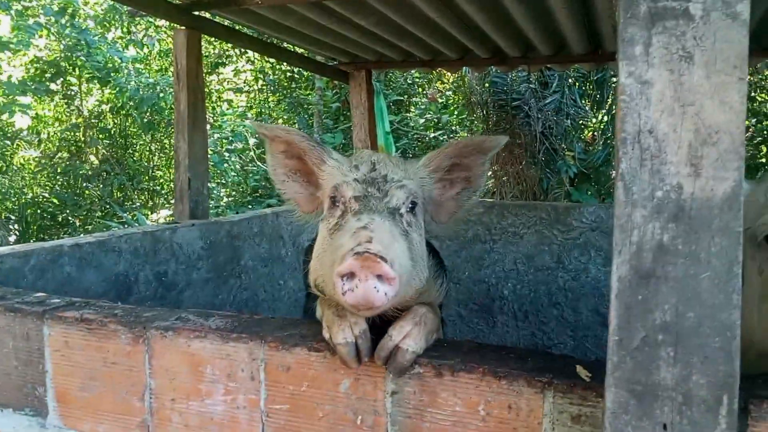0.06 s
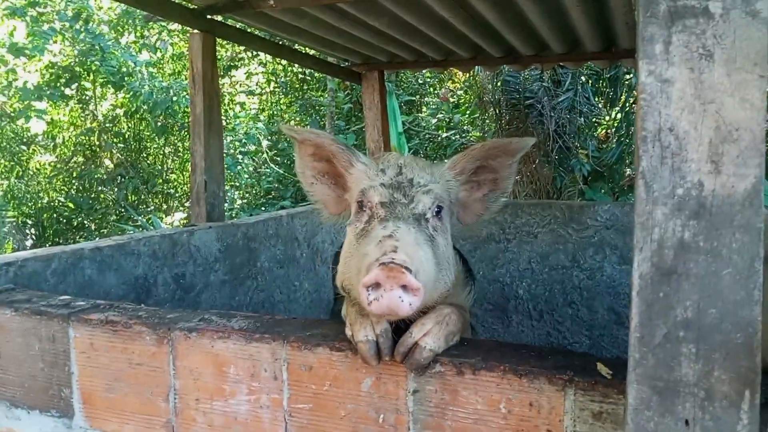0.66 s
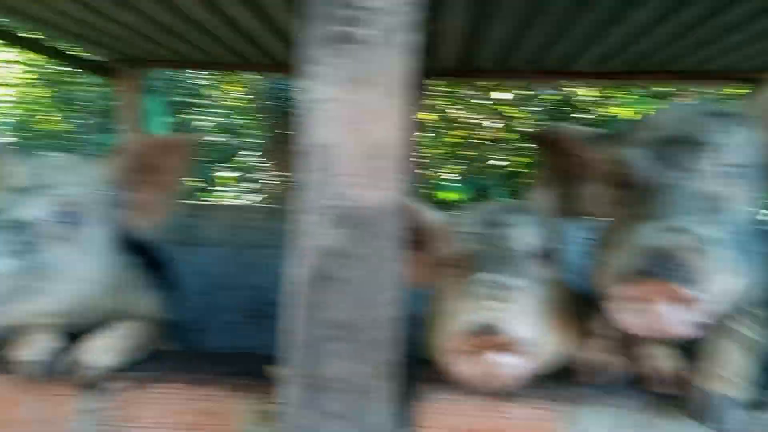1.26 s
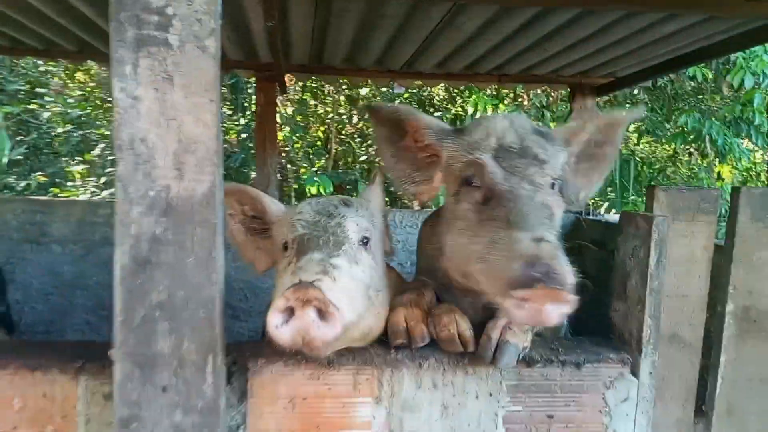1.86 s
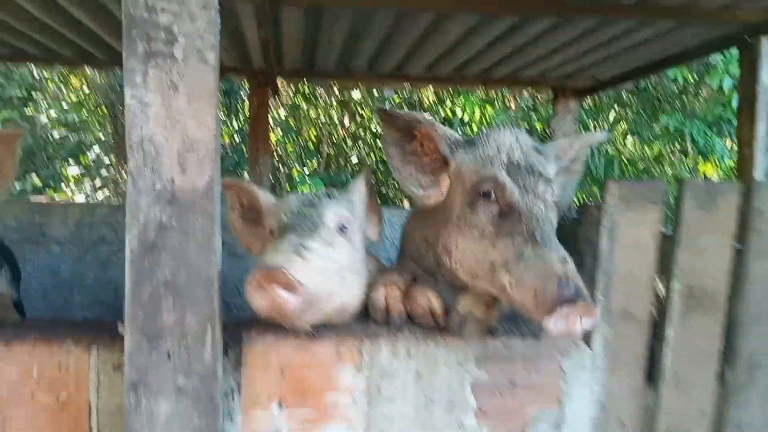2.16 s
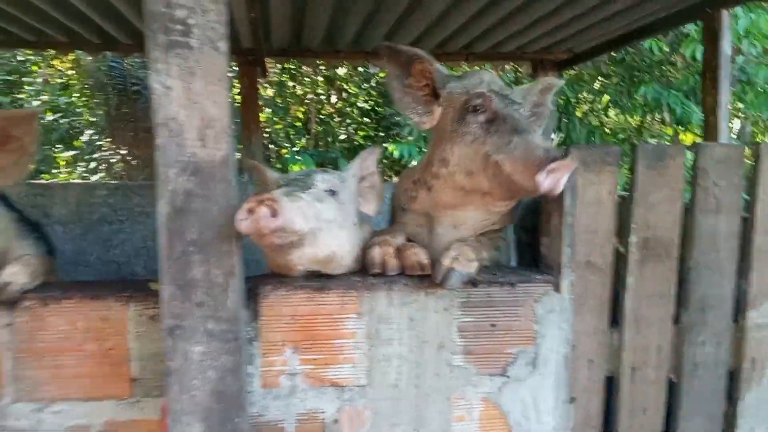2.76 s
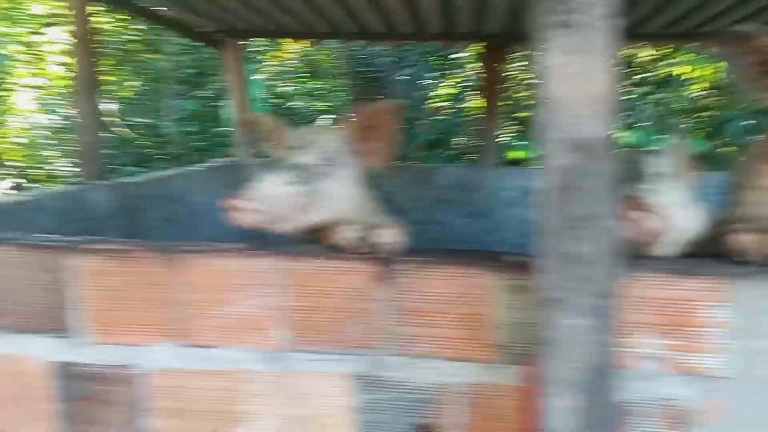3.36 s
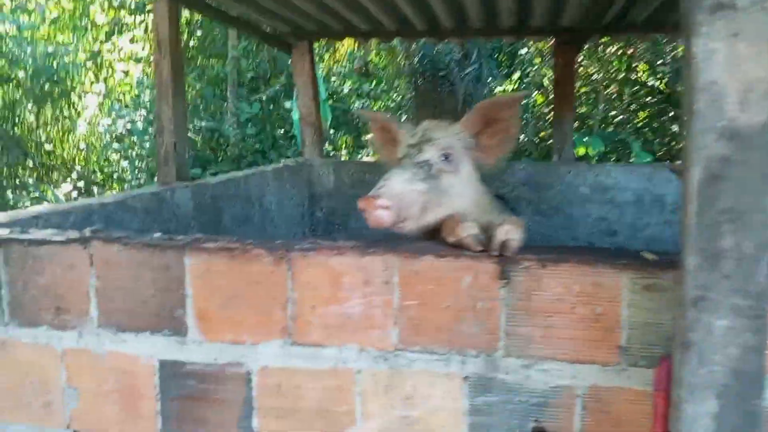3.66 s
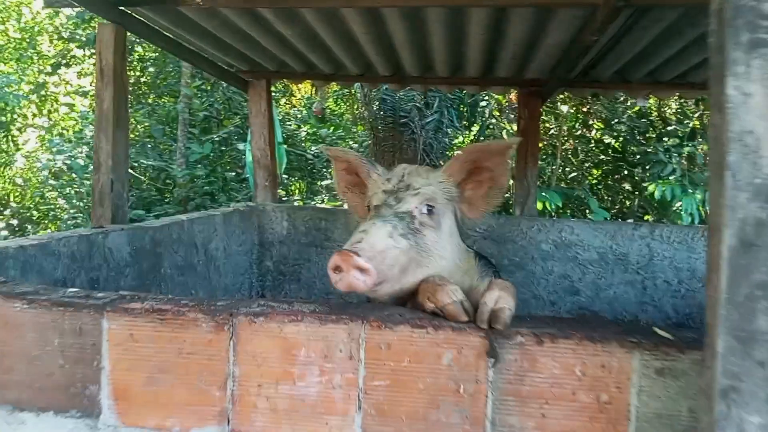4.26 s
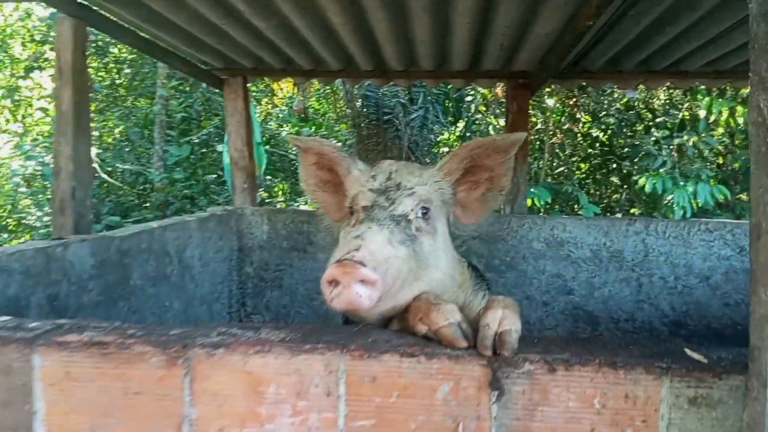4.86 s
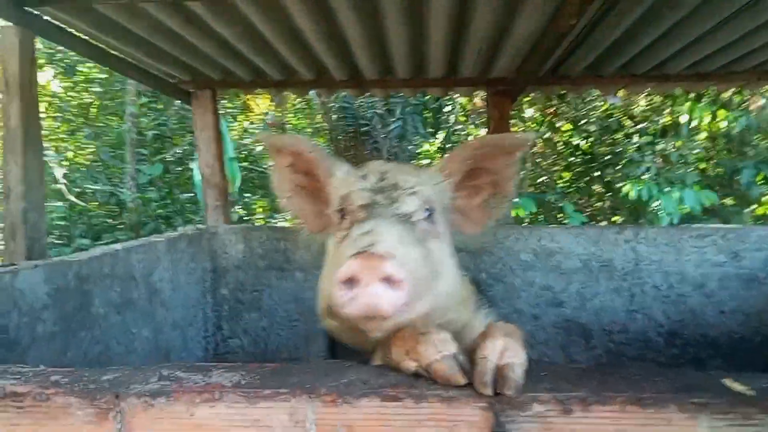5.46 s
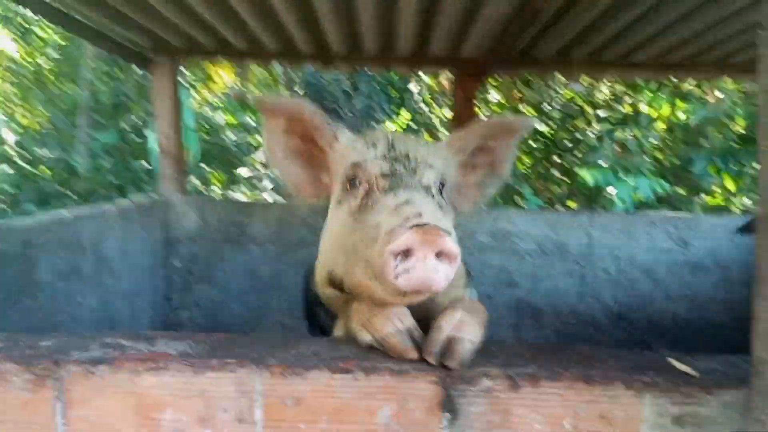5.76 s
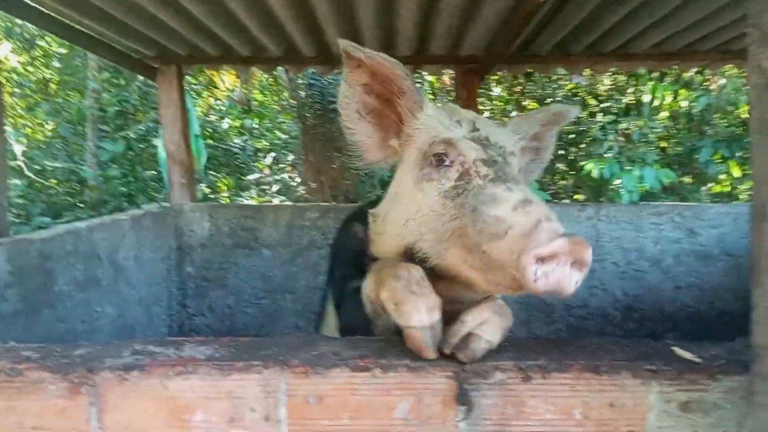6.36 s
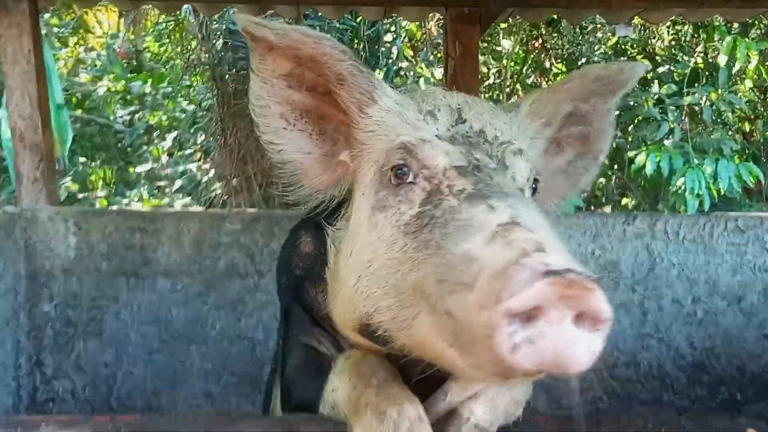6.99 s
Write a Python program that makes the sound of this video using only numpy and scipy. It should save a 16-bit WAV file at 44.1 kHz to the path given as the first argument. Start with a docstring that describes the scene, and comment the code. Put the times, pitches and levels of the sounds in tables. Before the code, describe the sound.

Short, throaty pig grunts and nostril puffs in a roofed pen, softer in the middle, with a quiet outdoor background.

```python
"""A low yard wash and faint insects in the trees run from start to finish.
At once, close by, pigs grunt in turn over the brick wall of a roofed pen: each grunt is a rattle of
about 35 throat beats a second ringing the long snout, and air hisses from the nostrils in between.
From about 1 s come a few wet lip smacks. The grunts drop to a mutter in the middle and are loud again
from 5.4 s. Walls and roof throw every beat back."""
import sys
import numpy as np
from scipy import signal
from scipy.fft import rfft, irfft
from scipy.io import wavfile
from scipy.ndimage import uniform_filter1d, map_coordinates

SR = 44100
rng = np.random.default_rng(int(sys.argv[2]) if len(sys.argv) > 2 else 0)


def to_wav(sig):
    """Store sig (one row per channel, or 1-D mono) as 16-bit WAV at the path in sys.argv[1].

    Samples outside -1..1 are clipped; the rate is SR.
    """
    pcm = np.clip(np.atleast_2d(sig), -1, 1) * 32767
    pcm = np.round(pcm).astype(np.int16)
    wavfile.write(sys.argv[1], SR, pcm.T)  # frames by channels


N = 318843

# the palette of throat shapes, one row a resonance: f/Hz, width/Hz, level/dB
NASAL = [(315, 74, -3), (712, 120, -3), (1100, 28, -5), (1220, 99, 3.2), (2000, 142, -5), (2900, 250, -25),
         (3460, 470, -18.5), (5080, 370, -22)]
OPEN = [(307, 57, -0.5), (520, 170, 0.5), (740, 70, -2), (915, 120, 2), (1190, 71, 6), (1790, 150, -10.5),
        (2850, 340, -13.5), (5650, 1100, -29.5)]
RASP = [(313, 52, -6.5), (651, 160, -13), (1277, 74, -4), (1680, 99, -5), (1860, 170, -4.5),
        (3630, 450, -23), (5750, 130, -13), (5950, 480, -15.5), (7524, 168, -34)]
SNOUT = [(334, 100, -1.5), (890, 110, -4), (1290, 200, -6), (1947, 194, -1.5), (2180, 54, -2),
         (3323, 467, -22), (3480, 490, -12), (4840, 570, -26.5)]
MUTTER = [(242.5, 39, 1.5), (355, 72, -6), (687, 103, -3.5), (1201, 99, -2.5), (1700, 127, 1),
          (3870, 260, -13.5)]
SNORT = [(361, 68, -5), (654, 176, -4), (1290, 124, -3), (1853, 220, 1.5), (2030, 96, 2), (3000, 250, -11),
         (3690, 740, -13.5)]
PURR = [(350, 100, -2), (760, 200, -11.5), (1344.3, 150, -1), (1846, 100, -1), (2035, 70, 3.5),
        (3420, 410, -16), (4509, 610, -14.5)]
BUZZ = [(311, 105, -1.5), (730, 80, -5.5), (1257, 60, -3), (1436, 150, -1), (2200, 910, -22),
        (3970, 710, -20.5), (5489, 256, -14.5), (7400, 330, -35), (8669, 420, -23)]
HONK = [(356, 140, -12.5), (796, 155, -10), (1200, 99, -2.5), (1477, 72, 1.5), (1620, 270, -9.5),
        (4340, 300, -16), (5510, 321, -17.5), (7489, 591, -43.1), (8960, 1060, -29)]
DEEP = [(310, 122, -2.0), (727, 144, -3.5), (1210, 65, 1.3), (1420, 250, -8.5), (1860, 220, -15.5),
        (2770, 70, -19), (3670, 320, -10.5), (4236, 120, -25), (5600, 800, -22.5)]
HOLLOW = [(302.4, 78, -1.5), (644, 126, -4.5), (1050, 40, -10.5), (1254, 135, -4.5), (2056, 200, -15),
          (3260, 287, -24.5), (3735, 110, -15), (4800, 1000, -31.5)]
# the same shapes by name
THROATS = dict(nasal=NASAL, open=OPEN, rasp=RASP, snout=SNOUT, mutter=MUTTER, snort=SNORT, purr=PURR, buzz=BUZZ, honk=HONK, deep=DEEP, hollow=HOLLOW)
# grunt cues: first beat t/s, last beat t/s, beats, middle beat's lag/s, crest level/dB, crest place/0-1,
# swell/dB, fade/dB, brightness/(dB per octave), resonance rise/share, chest send/dB,
# lead-in hum level/dB (None: runs on from the grunt before), air level/dB re the slap, throat name
GRUNTS = [ (.0058, .0355, 2, 0, -31, .1, 1, 15, -1.7, 0, -33, -60, -4, "nasal"),
          (.1128, .2264, 5, 0, -21.5, .72, 18, 15, -1, .03, -33, -65, -10, "open"),
          (.4434, .4981, 3, 0, -21, .85, 19, 1, -.5, .03, -32, -50, -17, "nasal"),
          (.523, .716, 7, -.0019, -22.5, .45, 0, 5.5, .8, .02, -29.5, None, -13, "rasp"),
          (.7485, .8004, 3, .0003, -21, .8, 2, 1, 2.4, .03, -32, None, -13, "open"),
          (1.023, 1.1052, 4, -.001, -21, .6, 19, 10, -1.3, 0, -31, -52, -10, "nasal"),
          (1.2561, 1.362, 5, -.0018, -22.5, .5, 17, 20, -1, 0, -35, -50, -9, "open"),
          (1.5158, 1.6352, 5, -.0009, -34, .3, 8, 3, 1.5, 0, -37, -43, -11.5, "snout"),
          (1.7437, 1.883, 6, -.0046, -25.5, .52, 22, 23, 0, .03, -34, -58, -8, "open"),
          (1.9605, 2.0759, 5, .001, -31.5, .55, 16, 2.5, 1.2, -.06, -35, -52, -8, "snout"),
          (2.5108, 2.6938, 7, .0046, -36.5, .3, 9, 7, -3.3, .1, -38.5, -57, -5, "mutter"),
          (2.7235, 2.8135, 4, 0, -31.5, .28, 5, 22, -1.2, -.04, -33, None, -6, "purr"),
          (3.4882, 3.6391, 6, .0005, -37.5, .38, 13, 10, -3.3, -.06, -37, -65, -6.5, "purr"),
          (3.743, 3.8237, 3, .003, -38, .4, 1, 3, -2, -.06, -39, None, 1, "snort"),
          (4.2235, 4.347, 5, .001, -31, .74, 8, 13, .6, .06, -35, -52, -11.5, "buzz"),
          (4.572, 4.7264, 6, -.0018, -35.5, .35, 11, 7, -1.2, -.04, -35, -58, -15, "purr"),
          (5.0685, 5.1845, 5, -.0032, -33.5, .75, 18, 2, -.3, .04, -33.5, -49, -10, "snout"),
          (5.215, 5.3482, 5, .0012, -33.5, .05, 0, 14, -.5, -.06, -31, None, 2.5, "snort"),
          (5.4413, 5.6495, 8, -.0028, -22.3, .83, 23, 15, -2, .12, -30, -65, -10, "honk"),
          (5.7212, 5.8297, 5, -.0015, -23.5, .7, 11, 7, .8, .04, -30, None, -17, "deep"),
          (6.176, 6.285, 5, -.001, -24.5, .63, 21, 7, .5, .05, -32, -51, -22, "deep"),
          (6.5817, 6.672, 4, .0005, -25, .6, 10, 8, -1, .09, -35, -48, -7, "hollow"),
          (6.8997, 6.9768, 3, .002, -37.5, .7, 3, 1, -4.5, -.1, -31, -46, 3, "snort"),
          (7.0197, 7.1617, 6, -.0023, -25, .3, 2.5, 10, 0, .08, -29, None, -7, "hollow")]
# nostril puff cues: peak t/s, half length/s, level/dB, brightness/(dB per octave)
SNIFFS = [(0.242, 0.019, -49.5, 0), (0.794, 0.045, -48.5, 0), (1.167, 0.065, -55, 1.5),
          (1.312, 0.044, -46.5, -1.5), (1.84, 0.035, -53, 1), (2.129, 0.046, -53.5, 1),
          (2.35, 0.014, -58, -2), (2.851, 0.027, -49.5, -2.5), (3.056, 0.11, -62, -1.5),
          (3.228, 0.018, -53.5, -1.5), (3.646, 0.068, -51, -2.5), (3.857, 0.037, -44.5, -2.5),
          (4.001, 0.021, -46.5, 2), (4.342, 0.084, -44.5, -3), (4.54, 0.041, -42, -2),
          (4.761, 0.1, -53, -2.5), (5.27, 0.085, -43.5, -4.2), (5.682, 0.07, -42, -5),
          (5.882, 0.03, -44.5, 2.5), (6.2, 0.019, -51, 6.5), (6.325, 0.038, -47, 0.5),
          (6.677, .035, -54.5, 3), (6.97, 0.055, -36.5, -3.5), (7.18, 0.11, -48.5, -2.5)]
# EQ of the nostril hiss: f/Hz, level/dB
NOSTRIL_EQ = [(120, -16), (200, -5), (957, -9), (1400, -5), (1650, -5.5), (1840, 0), (3610, -11),
              (5010, -2), (7620, -16), (10200, -13), (15500, -33)]
# lip smack cues: t/s, level/dB, centre f/Hz
SMACKS = [(.985, -34.5, 2500), (1.663, -43, 6000), (2.937, -46.5, 2500), (2.999, -41, 1720),
          (3.93, -42, 1980)]
# EQ of the yard wash: f/Hz, level/dB
YARD_EQ = [(18, -54), (30, -12), (81, -2), (173, -1), (455, -8), (606, -5), (996, -11.5), (1870, -6),
           (3400, -17), (5310, -26), (7650, -24), (9680, -24), (15500, -39)]
# early reflections off wall, floor and roof: delay t/s, gain
ECHOES = [(.0034, 0.022), (.0066, 0.18), (.0085, -0.12), (.0118, 0.18), (.0155, 0.061)]
# reverb tail under the roof: f/Hz, t60/s, level/dB
PEN_TAIL = [(312, 0.2, 6), (1230, 0.25, 0), (2500, 0.36, -8.5), (6000, 0.54, -8.5), (13900, 0.085, 6.5)]

TAPS = 4096  # samples in one beat's buffer
PREROLL_S = TAPS // 8 / SR  # room in that buffer ahead of the hit
BINS = np.fft.rfftfreq(TAPS, 1 / SR)
DULLING_DB_PER_OCTAVE, CLOSING_SHARE = .08, .002  # treble and resonances sink per dB under the crest
CREST_STRETCH = 1.005  # factor on the resonances at the crest
HUM_HZ, HUM_LEAD_S = 178, .037
CHEST_START_HZ, CHEST_END_HZ, CHEST_SINK_S = 166, 114, .13  # the chest note sinks as the air runs out
CHEST_TRIM_DB, CHEST_FOLLOWS = -4, .28  # the chest takes only this share of the effort's swell


def amp(db):
    """Decibels to gain."""
    return 10 ** (np.asarray(db) / 20)


def unit_rms(x):
    """Scales to an rms of one."""
    return x / np.sqrt(np.mean(x ** 2) + 1e-20)


def curve(points, hz, column=1):
    """Reads a column of a table along log frequency."""
    points = np.array(points)
    return np.interp(np.log(hz + 1), np.log(points[:, 0] + 1), points[:, column])


def add(mix, at_s, sound):
    """Drops a sound into the mix."""
    start = round(at_s * SR)
    sound = sound[max(-start, 0):]
    part = mix[max(start, 0):][:len(sound)]
    part += sound[:len(part)]


def tilt(hz, slope_db):
    """Tilt EQ in dB an octave, pivoting at 1200 Hz and flat below 500 Hz."""
    return amp(slope_db * np.log2(np.maximum(hz, 500) / 1200))


def minimum_phase(gain):
    """Spectrum of the fastest-starting ring that has this gain."""
    log_gain = np.log(np.r_[gain, gain[-2:0:-1]] + 1e-7)
    return np.exp(np.conj(signal.hilbert(log_gain)))[:len(gain)]


def noise(gain, size):
    """Noise of rms one, coloured by a gain for each frequency bin."""
    return unit_rms(irfft(rfft(rng.standard_normal(size)) * gain, size))


def wobble(size, smoothing):
    """Random modulator of rms one, smoothed over so many samples."""
    return unit_rms(uniform_filter1d(rng.standard_normal(size), size=smoothing))


def yard(wash_db=-60.5, insect_hz=5450, insect_width_hz=650, insect_db=-68.5, throb_db=2):
    """The bed: leaves and distance make a low wash; insects add a narrow, unsteady band."""
    hz = np.fft.rfftfreq(N, 1 / SR)
    insects = noise(np.exp(-((hz - insect_hz) / insect_width_hz) ** 2 / 2), N)
    throb = wobble(N, smoothing=2500)
    wash = noise(amp(curve(YARD_EQ, hz)), N)
    return amp(wash_db) * wash + amp(insect_db + throb_db * throb) * insects


def effort_arch(u, crest, swell_db, fade_db):
    """A grunt's push in dB re its rounded crest, as u runs from 0 to 1."""
    crest = np.clip(crest, .02, .98)
    before = np.maximum(crest - u, 0) / crest
    after = np.maximum(u - crest, 0) / (1 - crest)
    return -swell_db * before ** 1.6 - fade_db * after ** 1.7


def throat_gain(modes, stretch, slope_db, leak_db=-50, leak_hz=7000):
    """The throat as a filter: steep-sided resonances over a faint broad leak."""
    hz, width, db = np.transpose(modes)[:, :, None]
    peaks = amp(db) / (1 + 5 / 3 * ((BINS / stretch - hz) / width) ** 2)
    leak = amp(leak_db) / (1 + (BINS / leak_hz) ** 2)
    return np.sqrt((peaks ** 2).sum(0) + leak ** 2) * tilt(BINS, slope_db)


def chest_thump(period, chest_hz, width_hz=44, belly_hz=80, belly_width_hz=34, belly_db=-7.5,
                lead_s=.0045):
    """The low end: the puff of each cycle rings the lowest resonances of snout and body."""
    gain = sum(amp(db) / (1 + ((BINS - hz) / width) ** 2) ** 2
               for hz, width, db in [(chest_hz, width_hz, 0), (belly_hz, belly_width_hz, belly_db)])
    gain *= BINS ** 2 / (BINS ** 2 + belly_width_hz ** 2)
    delay = np.exp(-2j * np.pi * BINS * (PREROLL_S - lead_s))
    ring = irfft(minimum_phase(gain + 1e-5) * delay)
    return unit_rms(ring) * np.sqrt(period * SR / TAPS)


def throat_beat(gain, air_db, period, opening_hz=420, snap_hz=1900, spray_db=1, spray_s=.0013,
                gurgle_db=-14, gurgle_s=.0065, air_s=.016, glide=.066, glide_spread=.084, glide_s=.004,
                peel_s=.0015, peel_hz=1600):
    """One cycle: the folds part, slap shut with a wet spray, and leak air; all rings the throat."""
    t = np.arange(TAPS) / SR - PREROLL_S
    age = np.maximum(t, 0)
    attack = (1 - np.exp(-age / spray_s)) ** 2
    decays = np.exp(-age / [[spray_s], [gurgle_s], [air_s]])
    spray, gurgle, air = rng.standard_normal((3, TAPS)) * attack * decays
    air *= np.clip(2 - t / period, 0, 1)
    # the flow swells for a moment before each slap; soft flesh leaves the treble to the spray
    flow = (opening_hz + 1j * BINS) / (opening_hz - 1j * BINS)
    soft = 1 / (1 + 1j * BINS / snap_hz) ** 2
    slap = rfft(unit_rms(1. * (t == 0))) * flow * soft
    wet = amp(spray_db) * rfft(unit_rms(spray)) * (1 - abs(soft))
    breath = rfft(amp(gurgle_db) * unit_rms(gurgle) + amp(air_db) * unit_rms(air))
    # the slap peels along the soft folds, so its treble comes a moment after its bass
    peel = np.exp(-2j * np.pi * peel_s * (BINS / 3 - peel_hz * np.log1p(BINS / peel_hz)))
    ring = irfft((slap + wet + breath) * minimum_phase(gain) * peel)
    # the throat flexes after each slap, so its resonances chirp
    bend_s = (glide + glide_spread * rng.standard_normal()) * age * np.exp(-age / glide_s)
    ring = map_coordinates(ring, [np.arange(TAPS) - bend_s * SR], order=3)
    return unit_rms(ring) * np.sqrt(period * SR / TAPS * (1 + amp(air_db) ** 2 / 2))


def grunts(trim_db=.2, shimmer_db=1.1, chest_waver=.07, throat_waver=.01):
    """Rattles of beats, brighter and more open with effort, over a sinking chest note."""
    out = np.zeros(N)
    for (first, last, beats, lag, crest_db, crest, swell_db, fade_db,
         slope_db, rise, chest_db, hum_db, air_db, throat) in GRUNTS:
        u = np.linspace(0, 1, round(beats))
        period = (last - first) / (len(u) - 1)
        times = first + (last - first) * u + lag * 4 * u * (1 - u)
        effort = effort_arch(u, crest, swell_db, fade_db)
        brightness = slope_db + DULLING_DB_PER_OCTAVE * effort
        stretch = CREST_STRETCH + CLOSING_SHARE * effort + rise * (u - .5)
        if hum_db is not None:  # a soft hum leads in a fresh breath
            breath_start = first
            hum = chest_thump(period, HUM_HZ, width_hz=25, belly_db=-24)
            add(out, first - HUM_LEAD_S - PREROLL_S, amp(hum_db) * hum)
        air_left = np.exp((breath_start - times) / CHEST_SINK_S)
        chest_hz = CHEST_END_HZ + (CHEST_START_HZ - CHEST_END_HZ) * air_left
        for k, at in enumerate(times - PREROLL_S):
            shimmer, waver, flex = rng.standard_normal(3)
            gain = throat_gain(THROATS[throat], stretch[k] + throat_waver * flex, brightness[k])
            beat = throat_beat(gain, air_db, period)
            thump = chest_thump(period, chest_hz[k] * (1 + chest_waver * waver))
            add(out, at, amp(trim_db + crest_db + effort[k] + shimmer_db * shimmer) * beat)
            add(out, at, amp(CHEST_TRIM_DB + chest_db + CHEST_FOLLOWS * effort[k]) * thump)
    return out


def pen(x, tail_db=-11.7, build_s=.0053, reflections_per_s=3000):
    """The space: direct sound, a few near echoes, then a short diffuse tail under the roof."""
    t = np.arange(SR) / SR
    scatter = rng.standard_normal(SR) * (rng.random(SR) < reflections_per_s / SR)
    scatter *= 1 - np.exp(-(t / build_s) ** 2)
    hz, age, bands = signal.stft(scatter, SR, nperseg=256)
    band_db, t60 = curve(PEN_TAIL, hz, column=2), curve(PEN_TAIL, hz)
    bands *= amp(band_db[:, None] - 60 * age / t60[:, None])
    response = signal.istft(bands, SR, nperseg=256)[1]
    response *= amp(tail_db) / np.linalg.norm(response)
    direct = (.00052, .99)
    for delay, gain in [direct, *ECHOES]:
        add(response, delay, np.array([gain]))
    return signal.fftconvolve(x, response)[:N]


def sniffs(flutter_db=3.2):
    """Turbulent air in the wet nostrils swells, flutters and dies away."""
    out, t = np.zeros(N), np.arange(-SR // 2, SR // 2) / SR
    hz = np.fft.rfftfreq(len(t), 1 / SR)
    for peak_s, half_s, db, slope_db in SNIFFS:
        swell = np.exp(-(t / half_s) ** 2 / 2)
        flutter = wobble(len(t), smoothing=800)
        hiss = noise(amp(curve(NOSTRIL_EQ, hz)) * tilt(hz, slope_db), len(t))
        add(out, peak_s + t[0], amp(db + flutter_db * flutter) * swell * hiss)
    return out


def lip_smacks(decay_s=.0029):
    """Wet lips smack: short, damp ticks of band-passed noise."""
    out, t = np.zeros(N), np.arange(TAPS) / SR
    for at, db, hz in SMACKS:
        colour = minimum_phase(1 / (1 + np.log2((BINS + 1) / hz) ** 4))
        add(out, at, amp(db) * noise(colour, TAPS) * np.exp(-t / decay_s))
    return out


def scene():
    """The mono mix: the pigs through their pen, the yard dry around it."""
    pigs = grunts() + sniffs() + lip_smacks()
    return (pen(pigs) + yard())[None]


def record(dry, low_cut_hz=54, high_cut_hz=15900):
    """A small microphone: thin in the deep bass, with the very top cut off."""
    thin = signal.sosfilt(signal.butter(3, low_cut_hz, "high", fs=SR, output="sos"), dry)
    high_cut = signal.firwin(511, high_cut_hz, window=("kaiser", 9), fs=SR)
    return signal.oaconvolve(thin, high_cut[None], "same")


dry = scene()
out = record(dry)
to_wav(out)
```